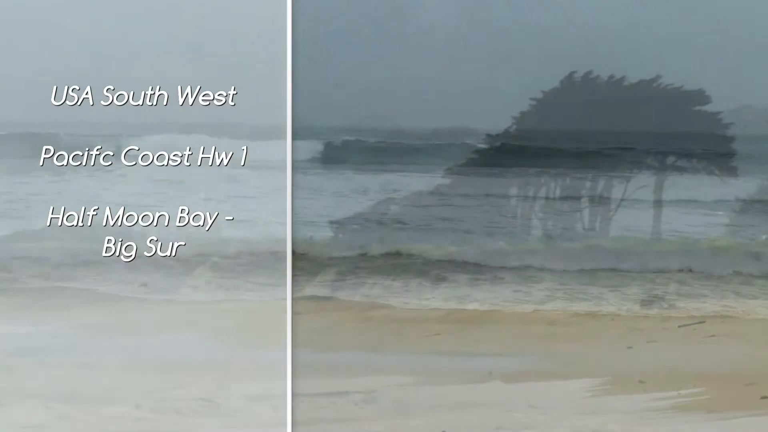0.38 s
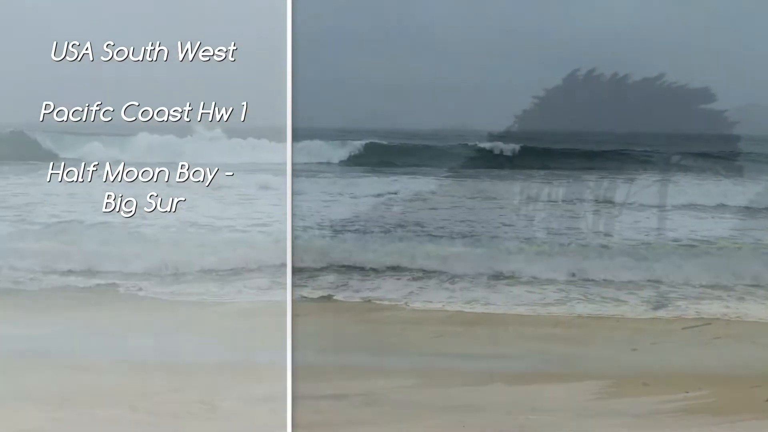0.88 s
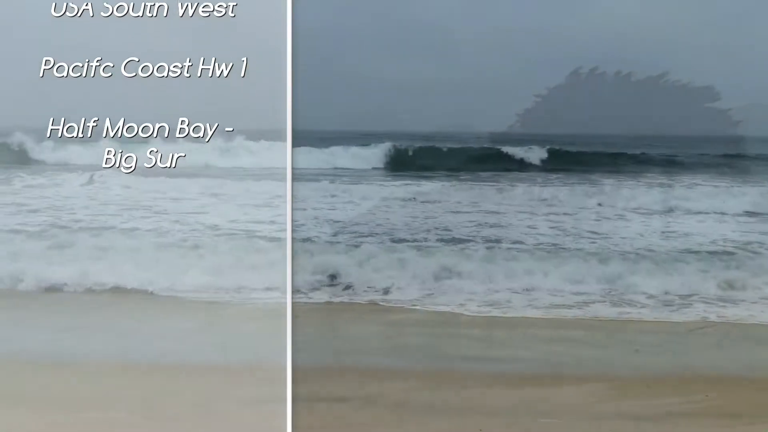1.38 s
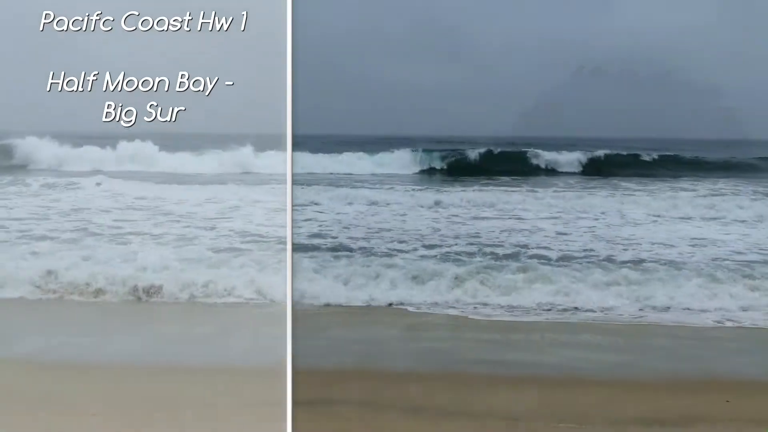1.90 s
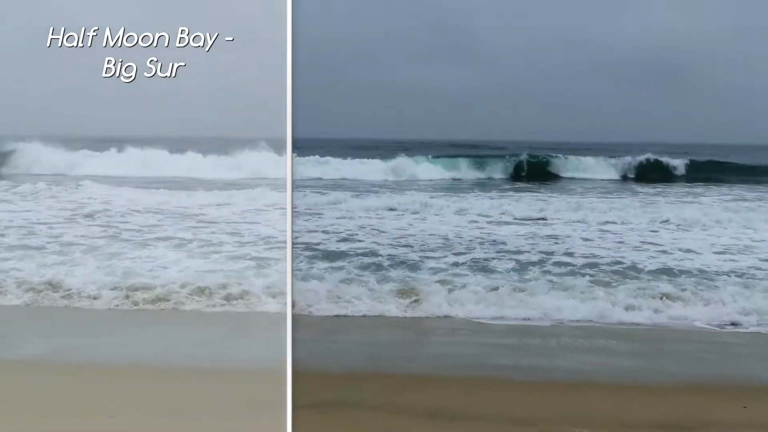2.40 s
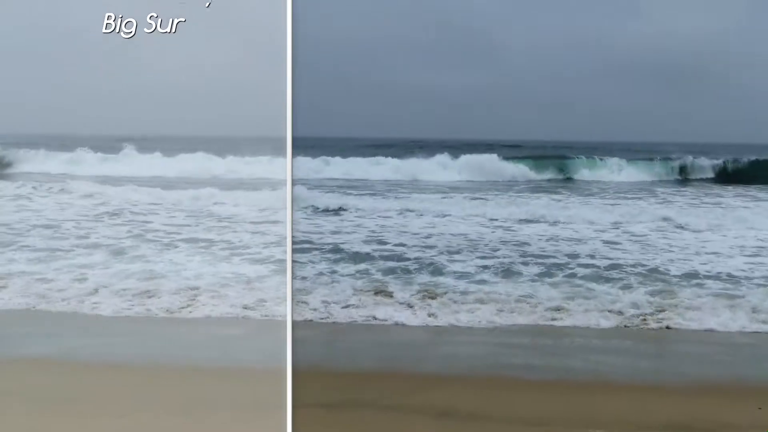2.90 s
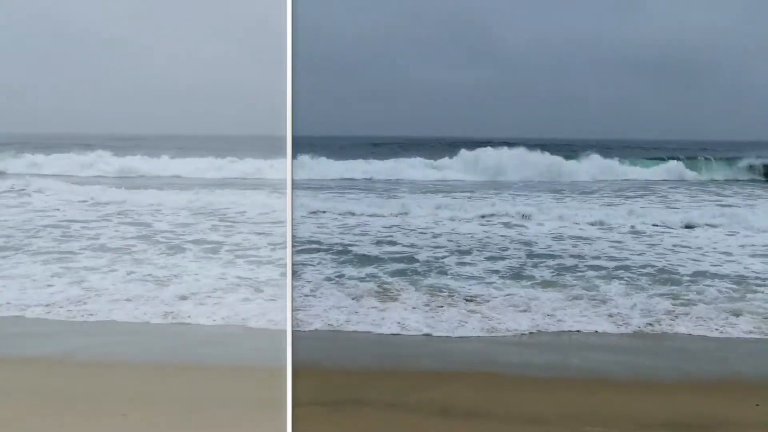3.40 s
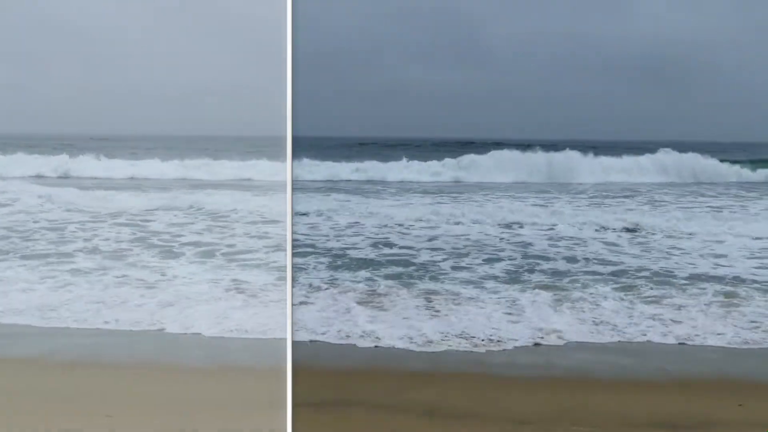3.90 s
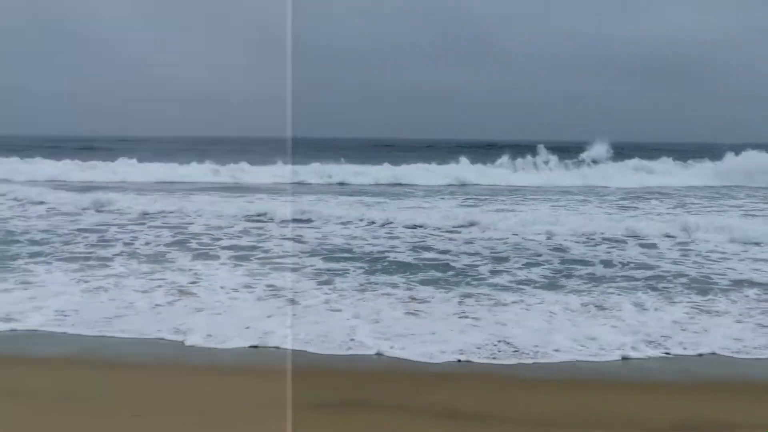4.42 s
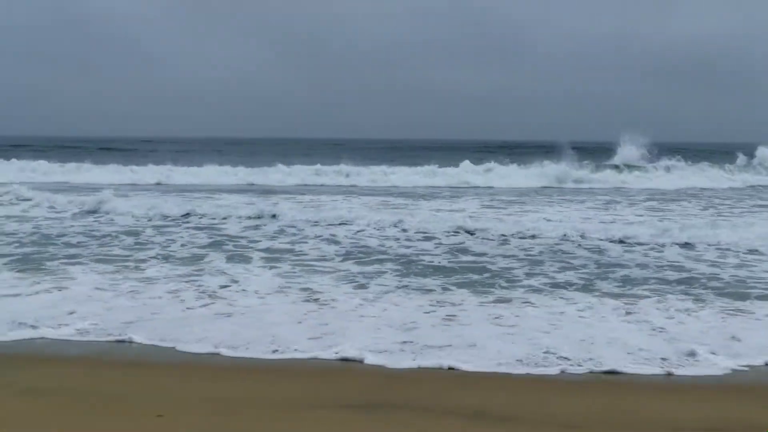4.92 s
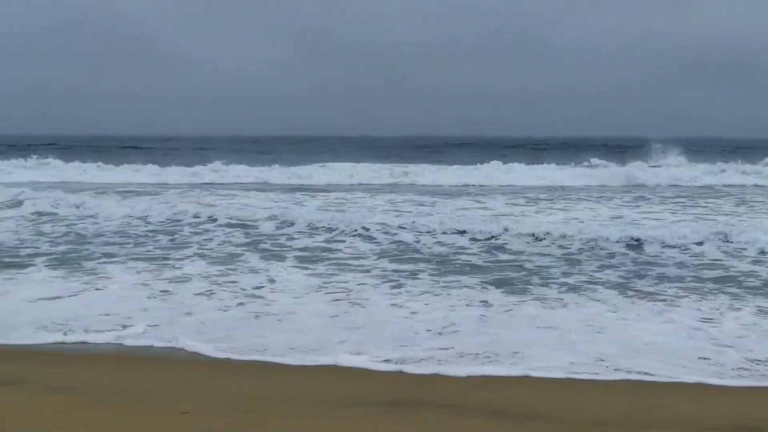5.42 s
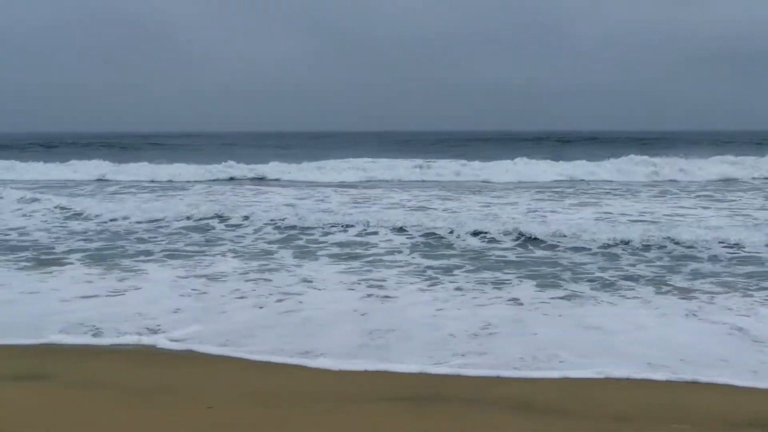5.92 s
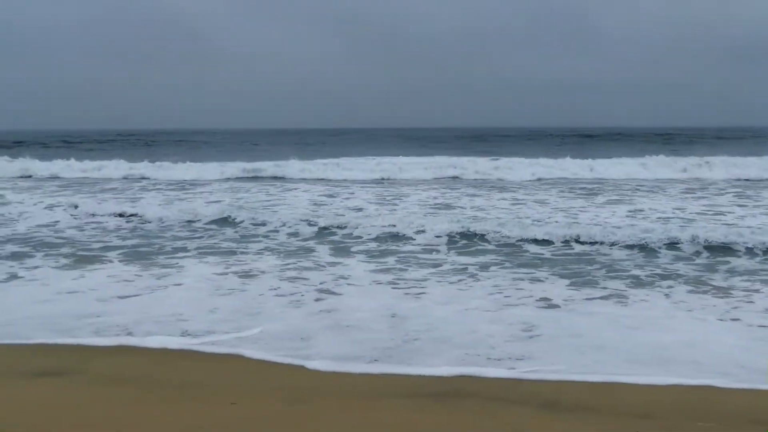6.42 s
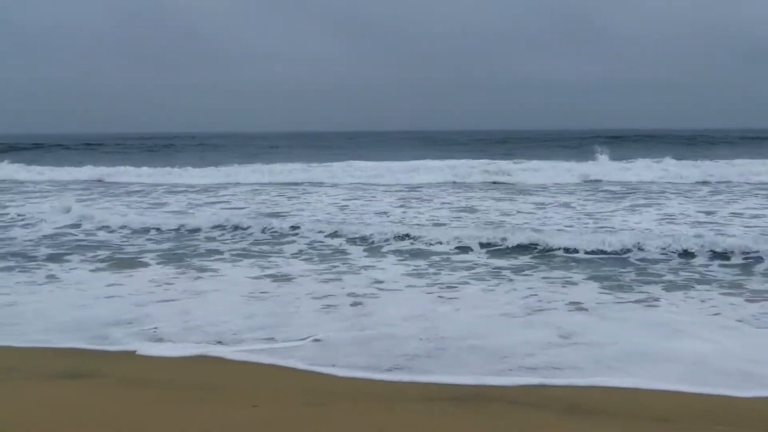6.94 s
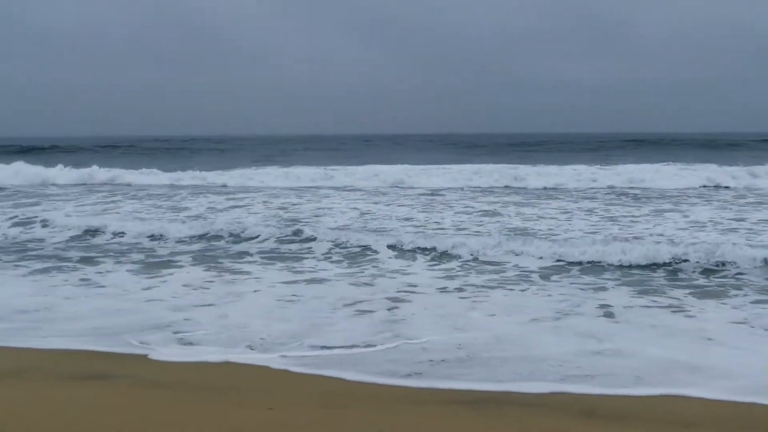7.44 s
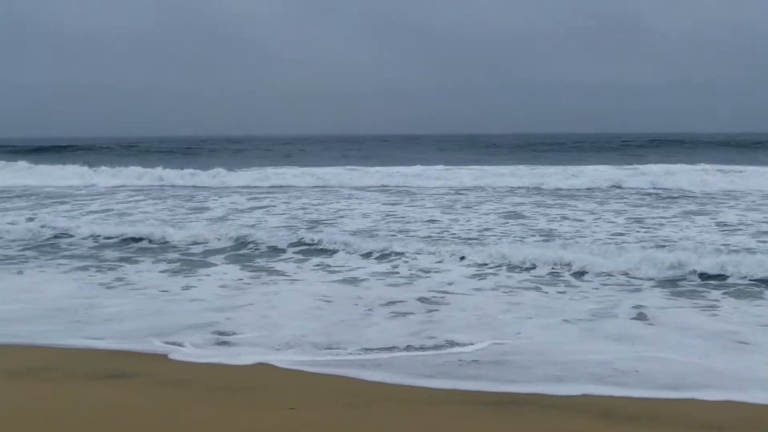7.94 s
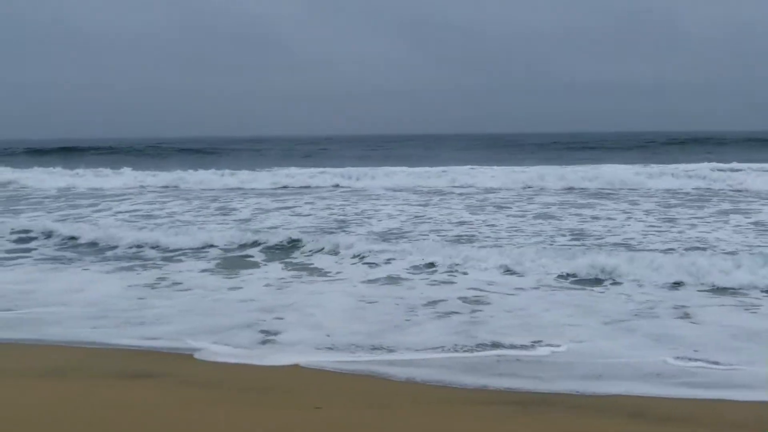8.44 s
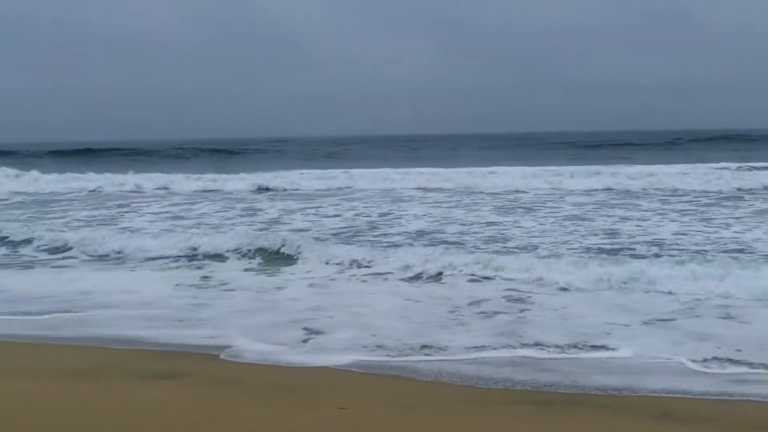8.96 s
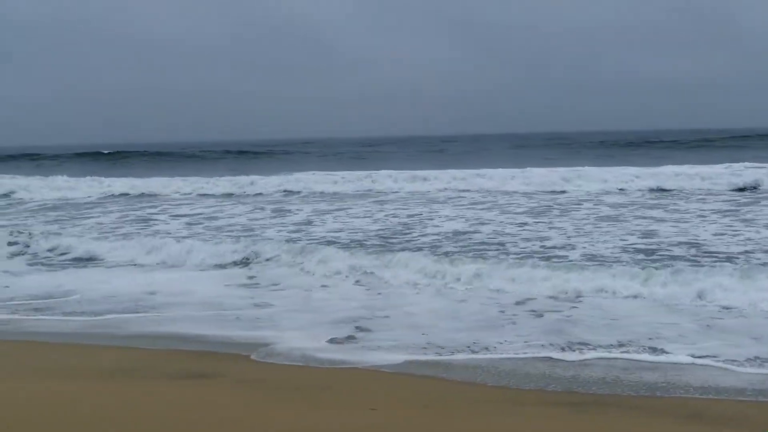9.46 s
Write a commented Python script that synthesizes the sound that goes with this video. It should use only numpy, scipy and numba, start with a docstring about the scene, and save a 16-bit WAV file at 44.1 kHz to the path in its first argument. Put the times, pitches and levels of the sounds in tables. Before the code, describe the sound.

Waves tumble and foam hisses along a sandy beach, rising from near silence into a full, steady, low-weighted rush with faint wind buffets.

```python
"""Half a second of near silence, then ocean surf fades in over four seconds, from a sandy beach.
A small stereo camera hears the surf roar swell low, broken water tumble inshore and foam hiss up the sand:
all are bands of one bubble noise that swell in turn, with a high fizz of spray on each inshore wave.
Damped sines gurgle as single bubbles in the swash; noise separate at each port makes light wind.
Two notch filters cut narrow gaps in the sound."""
import sys
import numpy as np
from scipy import signal
from scipy.fft import rfft, irfft, next_fast_len
from scipy.io import wavfile
from scipy.ndimage import uniform_filter1d
from numba import njit

SR = 44100
rng = np.random.default_rng(int(sys.argv[2]) if len(sys.argv) > 2 else 0)


def waveform_to_disk(signal):
    """Save audio, clipped to [-1, 1], as 16-bit WAV at the path in sys.argv[1]."""
    frames = np.transpose(np.atleast_2d(signal))
    scaled = np.clip(frames, -1, 1) * 32767
    samples = np.round(scaled).astype(np.int16)
    wavfile.write(sys.argv[1], SR, samples)


def convert_level_to_amplitude(level_db):
    """Map a level in decibels to its linear amplitude factor."""
    exponent = np.asarray(level_db, float) / 20
    return 10 ** exponent


N = 422478  # samples

# colour of the rush through the microphone: pitch_hz, relative level_db per Hz
RUSH_COLOUR = [(25, -53), (60, -24), (130, -4.5), (260, 1), (370, -4), (500, -11.5), (750, -13),
               (1500, -21.5), (2200, -23), (3000, -28), (4500, -27), (7500, -39), (9500, -35.5),
               (15000, -56.5)]
# what the two ports do not share, from water spread along the shore: pitch_hz, level_db per Hz as RUSH_COLOUR
SHORE_SPREAD = [(25, -50), (120, -44), (300, -29.5), (480, -25.5), (880, -26), (2400, -33.5), (3600, -36),
                (8000, -45.5), (10000, -45), (15000, -57)]
# level between the ports at place 1: pitch_hz, left_minus_right_db
PORT_LEAN = [(60, 0.0), (110, 0), (200, -0.5), (370, 0.0), (690, -0.5), (1270, -1.5), (2340, -4.5),
             (4310, -0.5), (7940, -1.5), (14600, 1)]
# brief low swells of the surf roar: loudest_s, level_db on the steady rush, pitch_hz
LOW_SWELLS = [(1.399, -2, 200), (3.5, -2, 110), (4.4, -2, 120), (5.6, -3.5, 140), (6.7, -3.5, 200),
              (8.0, -3, 180), (9.0, -5, 160)]
# waves that collapse inshore and tumble up the beach:
# loudest_s, build_s, die_s, level_db on the steady rush, pitch_hz, place (multiplies PORT_LEAN, minus swaps ports)
INSHORE_WAVES = [(.85, .5, 1.54, 6, 850, -4), (2.6, 0.71, 1.0, 2.5, 1190, 0.5), (6.6, .5, .7, -3, 380, 1.0),
                 (9.2, 1.77, 1.5, 2.5, 600, 3.5)]
# sheets of foam sliding up the sand: loudest_s, level_db on the steady rush, pitch_hz
FOAM_SHEETS = [(.85, -3, 5000), (2.5, -1.5, 3000), (3.3, -2.5, 4000), (4.85, -3.5, 4420), (5.4, -3.5, 3500)]
# colour of wind eddies at a port: pitch_hz, relative level_db per Hz
WIND_COLOUR = [(20, -22), (40, -19), (140, -4), (230, -7.5), (500, -15), (1000, -37)]
# gusts on the ports: strongest_s, length_s (each flank), level_db before buffeting
GUSTS = [(.6, .3, -43), (2.6, 0.18, -39), (3.25, .25, -39.5), (6.0, .3, -40), (6.8, .35, -37),
         (7.6, .3, -36), (8.25, 0.35, -33), (9.3, 0.27, -33.5)]
# peak and dip of the microphone housing: pitch_hz, width_hz, level_db
HOUSING = [(5730, 850, 2.5), (7500, 3700, -0.5)]
# narrow gaps: pitch_hz, width_hz, level_db
NOTCHES = [(575, 94, -32), (2666, 264, -33)]

RUSH_PLACE = 0.94  # where the steady water lies, multiplies PORT_LEAN


def at(table, hz):
    """Value of (Hz, value) points, joined on a log-frequency axis."""
    f, v = np.transpose(table)
    return np.interp(np.log(hz + 1), np.log(f + 1), v)


def walk(rate_hz):
    """Random levels held 1 / rate_hz seconds and slewed twice; spread near 1."""
    hold = int(SR / rate_hz)
    steps = np.repeat(rng.standard_normal(N // hold + 1), hold)
    slewed = uniform_filter1d(uniform_filter1d(steps, hold), hold)
    return 1.3 * slewed[:N]


def hump(peak_s, build_s, die_s):
    """Power that builds to 1 and dies away, bell-shaped on both flanks."""
    late_s = np.arange(N) / SR - peak_s
    return np.exp(-(late_s / np.where(late_s < 0, build_s, die_s)) ** 2)


def reach(hz, centre_hz, octaves):
    """Share of power that a sound centred elsewhere has at this pitch."""
    return np.exp(-(np.log2(hz / centre_hz) / octaves) ** 2)


def swell(events, hz):
    """Level in dB and place over time near this pitch: events add their power to the steady rush."""
    power, moment = 1, RUSH_PLACE
    for own_power, centre_hz, octaves, place in events:
        part = own_power * reach(hz, centre_hz, octaves)
        power = power + part
        moment = moment + part * place
    return 10 * np.log10(power), moment / power


def rush(events, surge_db=0.03, patch_db=0.5, flicker_db=0.57):
    """Countless bursting bubbles merge to noise; half-octave bands surge together, in patches and alone."""
    size = next_fast_len(N)
    hz = np.fft.rfftfreq(size, 1 / SR)
    colours = convert_level_to_amplitude([at(RUSH_COLOUR, hz), at(SHORE_SPREAD, hz)])
    mid, side = rfft(rng.standard_normal((2, size))) * colours
    ports = np.array([mid + side, mid - side])
    out, surge, patch = 0, walk(7), walk(8)
    for octave in np.arange(4.5, 14.1, .5):  # band centres, log2 of Hz
        mask = np.cos(np.pi / 2 * np.clip(2 * (np.log2(hz + 1) - octave), -1, 1)) ** 2
        patch = np.sqrt(.5) * (patch + walk(8))  # neighbouring bands share part of a patch
        level_db, place = swell(events, 2 ** octave)
        db = level_db + surge_db * surge + patch_db * patch + flicker_db * walk(22)
        # the camera body shades the far port; long waves bend round it
        lean_db = at(PORT_LEAN, 2 ** octave) * place / 2
        band = irfft(ports * mask, size)[:, :N]
        out = out + convert_level_to_amplitude(db + np.array([lean_db, -lean_db])) * band
    return out * convert_level_to_amplitude(-12) / np.std(out[:, N // 2:])  # rms dB over the second half


def inshore_waves():
    """Waves collapsing inshore: broad tumbling, with a high fizz of thrown-up spray on the same swell."""
    tumble_octaves = 1.01
    fizz_hz, fizz_octaves, fizz_db = 12000, 0.78, -3.5  # level against the tumbling
    out = []
    for s, build_s, die_s, db, hz, place in INSHORE_WAVES:
        tumble = convert_level_to_amplitude(db) ** 2 * hump(s, build_s, die_s)
        fizz = tumble * convert_level_to_amplitude(fizz_db) ** 2
        out += [(tumble, hz, tumble_octaves, place), (fizz, fizz_hz, fizz_octaves, place)]
    return out


def foam_sheets():
    """Foam sliding up the sand: bursting bubbles swell the hiss quickly, then it dies away."""
    build_s, die_s, octaves = 0.23, 0.42, 1.23
    return [(convert_level_to_amplitude(db) ** 2 * hump(s, build_s, die_s), hz, octaves, RUSH_PLACE) for s, db, hz in FOAM_SHEETS]


def low_swells():
    """Brief low swells of the surf roar: power added to the bass of the rush."""
    build_s, die_s, octaves = 0.39, 0.47, 0.77
    return [(convert_level_to_amplitude(db) ** 2 * hump(s, build_s, die_s), hz, octaves, RUSH_PLACE) for s, db, hz in LOW_SWELLS]


@njit
def ring(start, hz, cycles, size, glide, n):
    """Each bubble is a damped sine whose pitch rises as it nears the surface."""
    out = np.zeros(n)
    for j in range(len(start)):
        length = int(cycles[j] * SR / hz[j])  # samples to fall to 1/e
        phase = 0.
        for i in range(min(4 * length, n - start[j])):
            phase += 2 * np.pi * hz[j] * (1 + glide * i / length) / SR
            out[start[j] + i] += size[j] * np.exp(-i / length) * np.sin(phase)
    return out


def bubbles(events, level_db=-36, low_hz=500, octaves=3.0, spread_db=3.5, glide=0.05):
    """Single gurgles that swell with the rush, mostly faint, a few stand out, scattered left and right."""
    count = int(260 * N / SR)  # 260 bubbles per second
    when, pitch, strength, damping, side = rng.random((count, 5)).T
    start = (when * N).astype(np.int64)
    hz = low_hz * 2 ** (octaves * pitch)
    colour_db = at(RUSH_COLOUR, hz) - at(RUSH_COLOUR, low_hz)
    size = convert_level_to_amplitude(level_db - spread_db * np.log(1 - strength) + colour_db)
    cycles = 2 + 6.0 * damping
    angle = np.pi / 2 * side
    pair = [ring(start, hz, cycles, size * gain, glide, N) for gain in (np.cos(angle), np.sin(angle))]
    return np.array(pair) * convert_level_to_amplitude(swell(events, 1500)[0])


def wind(breeze_db=-43, buffet_db=3.5):
    """Eddies at each port, unrelated left and right, in short buffets that grow with the gusts."""
    size = next_fast_len(N)
    colour = convert_level_to_amplitude(at(WIND_COLOUR, np.fft.rfftfreq(size, 1 / SR)))
    eddies = irfft(rfft(rng.standard_normal((2, size))) * colour, size)[:, :N]
    gusts = sum(convert_level_to_amplitude(db) ** 2 * hump(s, length_s, length_s) for s, length_s, db in GUSTS)
    power = convert_level_to_amplitude(breeze_db) ** 2 + gusts
    buffets = convert_level_to_amplitude(buffet_db * np.array([walk(32), walk(32)]))
    return eddies / np.std(eddies) * np.sqrt(power) * buffets


def scene():
    """The rush of the surf with its gurgles, and wind at the microphone."""
    # each event: power over time, pitch in Hz, breadth in octaves, place
    events = inshore_waves() + foam_sheets() + low_swells()
    return rush(events) + bubbles(events) + wind()


def low_pass(x):
    """Removes everything above the highest recorded frequency."""
    return signal.sosfilt(signal.butter(12, 15230, fs=SR, output="sos"), x)


def record(dry):
    """Housing peak and dip, two notches, softly rounded peaks, then a straight fade-in."""
    for hz, width_hz, db in HOUSING + NOTCHES:
        w = 2 * np.pi * hz / SR
        a = np.sin(w) * width_hz / hz / 2
        above = [1 + a * convert_level_to_amplitude(db), -2 * np.cos(w), 1 - a * convert_level_to_amplitude(db)]
        below = [1 + a, -2 * np.cos(w), 1 - a]
        dry = signal.lfilter(above, below, dry)
    rounded = np.tanh(.6 * dry) / .6
    fade_start_s, fade_s = 0.54, 3.83
    fade = np.clip((np.arange(N) / SR - fade_start_s) / fade_s, 0, 1)
    return low_pass(rounded * fade)


dry = scene()
out = record(dry)
waveform_to_disk(out)
```